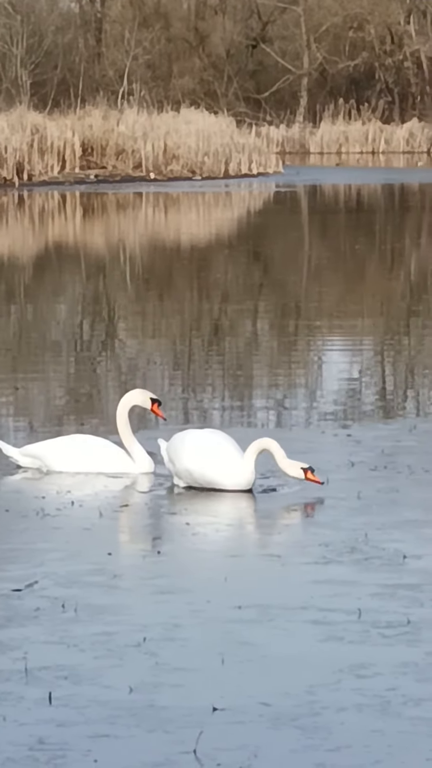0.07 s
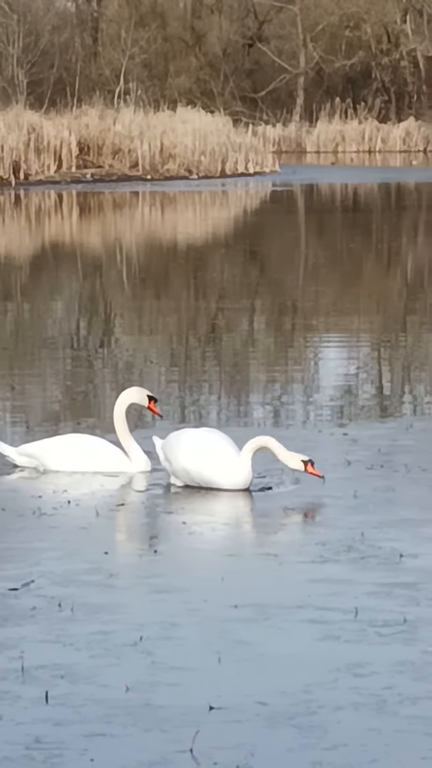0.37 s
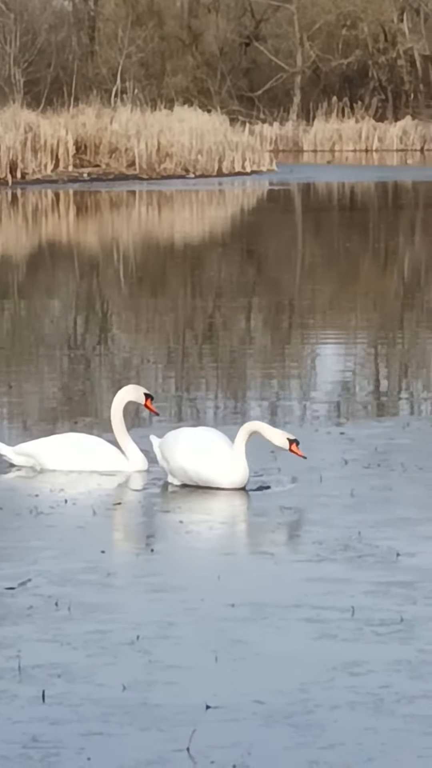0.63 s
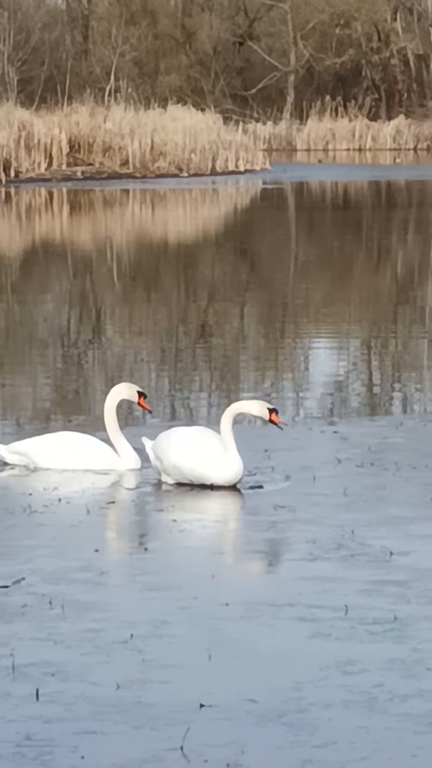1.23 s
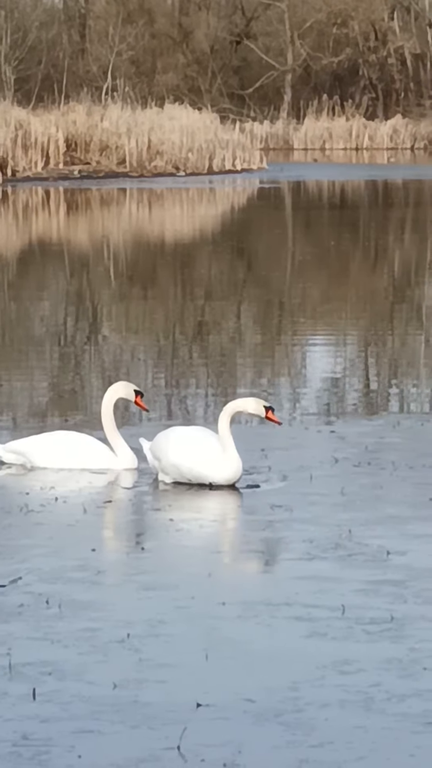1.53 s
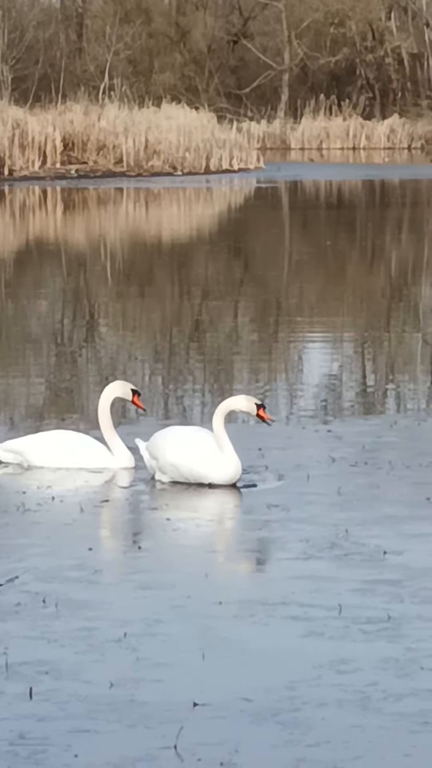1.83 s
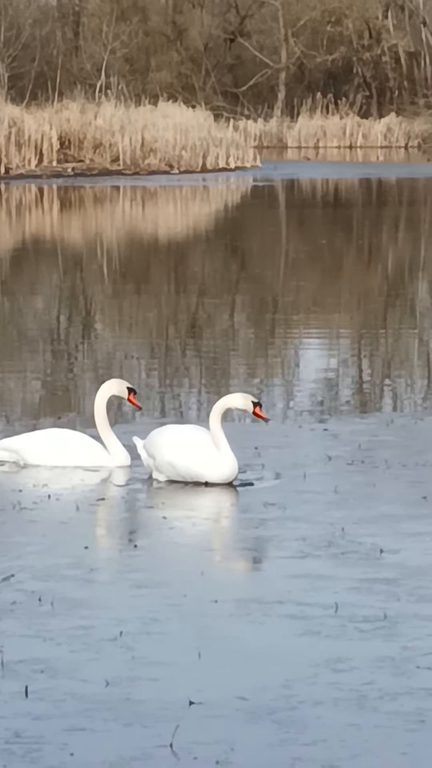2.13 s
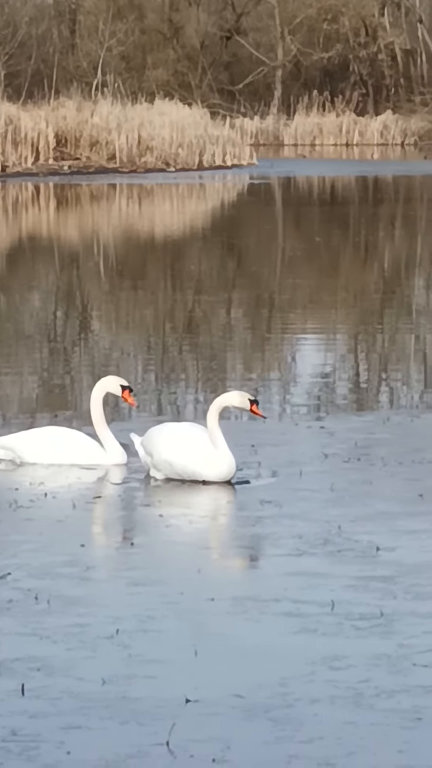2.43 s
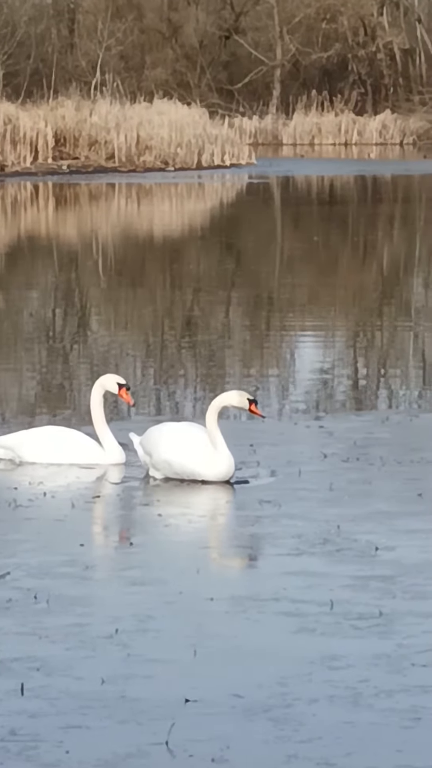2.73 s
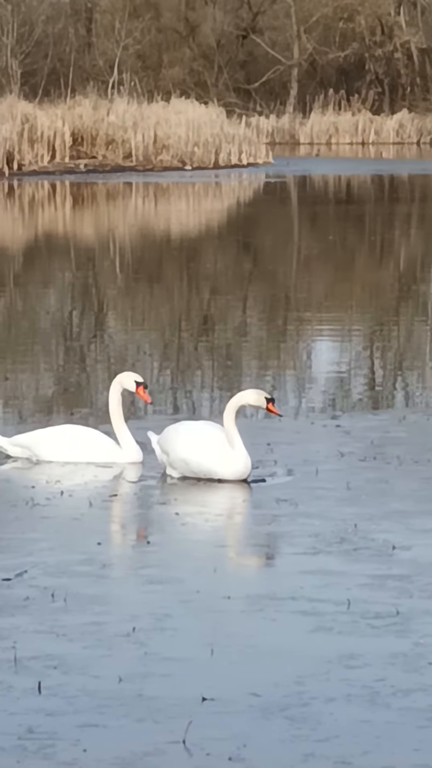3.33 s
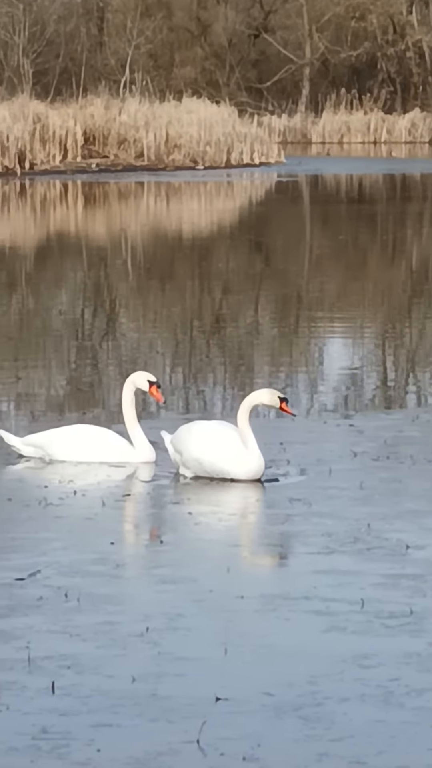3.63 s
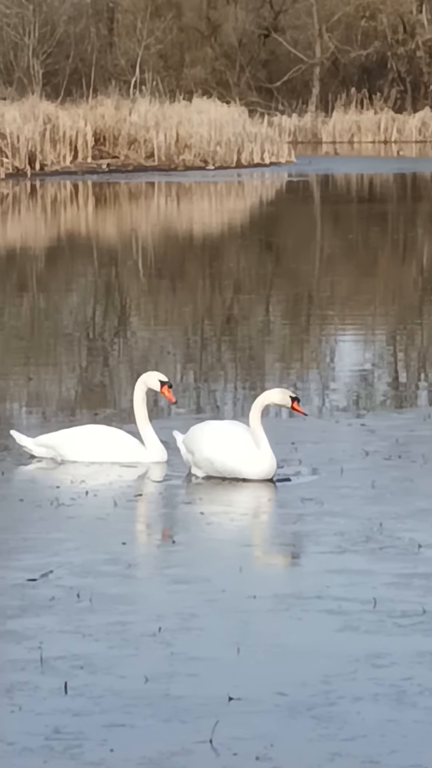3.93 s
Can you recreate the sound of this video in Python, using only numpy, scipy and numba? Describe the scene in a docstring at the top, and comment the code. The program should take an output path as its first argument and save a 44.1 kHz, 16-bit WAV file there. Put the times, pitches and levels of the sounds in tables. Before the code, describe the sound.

Hoarse, snorting swan grunts repeat on an open lake, most followed by a brief nasal hum. A breeze nudges the microphone at first, then faint ticks sound between the calls, over a low drone of far traffic.

```python
"""On a half-frozen lake, a mute swan gives seven hoarse, snorting grunts; most relax into a soft nasal hum.
A membrane beats in its throat, the throat and nose colour the sound, and the wooded shore answers.
Distant traffic rumbles and drones, and a breeze bumps the right microphone port.
Faint chirps of far songbirds and a few tiny ticks, perhaps of thin ice, come in between."""
import sys
import numpy as np
from scipy import signal
from scipy.fft import rfft, irfft, next_fast_len
from scipy.io import wavfile
from scipy.ndimage import map_coordinates
from numba import njit

SR = 44100
rng = np.random.default_rng(int(sys.argv[2]) if len(sys.argv) > 2 else 0)


def dump_mix(stems):
    """Bounce the given channels to the path in sys.argv[1] as a 16-bit WAV at rate SR."""
    frames = np.atleast_2d(stems).T  # one column per channel
    limited = np.clip(frames, -1, 1)  # hard clip at full scale
    pcm = np.round(limited * 32767).astype(np.int16)
    wavfile.write(sys.argv[1], SR, pcm)


N = 176400  # 4 seconds

# Tone colours, or how strong the lows and highs are: (frequency [Hz], gain [dB])
AIR_COLOUR = [(180, -10), (300, 1), (430, 2.5), (600, -1), (850, -2.5), (1150, -5), (1800, -2.5),
              (2100, -2.5), (2600, -9.5), (3400, -11.5), (4000, -17), (4700, -19.5), (5500, -25),
              (6800, -27), (7400, -26), (8800, -31.5), (11000, -33.5), (12000, -39), (15500, -48)]
RUMBLE_COLOUR = [(20, -54), (40, -11), (62, 0.5), (95, -0.5), (145, 1.5), (200, -5.5), (270, -17),
                 (450, -33), (900, -61)]
VEHICLE_COLOUR = [(90, -32), (170, 11.5), (240, 8.5), (330, -12.5), (700, -52.5)]
BREEZE_COLOUR = [(20, -46.5), (40, -22), (65, -1.5), (105, -1), (150, -7.5), (220, -16.5), (350, -34),
                 (700, -53), (2000, -97.5)]
BUMP_COLOUR = [(30, -34), (65, -4), (110, 5.5), (170, -3), (240, -14), (380, -30), (900, -62), (2500, -120)]
SNAP_COLOUR = [(3000, -21), (5500, -14), (6500, -4.5), (8300, 4), (10000, 0), (12000, -11), (15000, -20)]
HUM_COLOUR = [(170, -20.5), (350, -5.5), (530, 2), (710, -2), (885, 0.5), (1070, -5), (1420, -6),
              (1780, 0.5), (2130, 1.5), (2480, -5), (2750, -11), (3600, -47.5), (6000, -86)]
THROAT_COLOUR = [(180, -23.5), (330, -9), (420, -26), (530, -2), (680, -9.5), (780, -7.5), (1000, -11.5),
                 (1240, -6.5), (1450, -14.5), (1590, -6), (1740, -6), (1990, -0.5), (2200, -7),
                 (2550, -4.5), (3100, -14), (3550, -36), (4300, -40), (4950, -32), (5700, -37.5),
                 (6300, -49), (7000, -45.5), (9000, -57), (14000, -70.5)]
# How alike a noise is on the left and right: (frequency [Hz], likeness [-1 to 1])
AIR_ALIKE = [(300, 0.64), (2000, 0.21), (3500, -0.27), (12000, 0.082)]
RUMBLE_ALIKE, VEHICLE_ALIKE, WIND_ALIKE = [(200, 0.88)], [(200, 0.99)], [(100, 0)]
# Noises that swell and sink: (time [s], level [dB])
VEHICLE_LEVEL = [(0, -66), (2.6, -70.5), (3.1, -64.5), (3.55, -55.5), (4, -63)]
BREEZE_LEVEL = [(0, -41), (.8, -41.5), (1.3, -52.5), (1.9, -46.5), (2.4, -58.5), (2.9, -51.5), (3.4, -57.5),
                (4, -52.5)]
# Two far engines: (time [s], pitch [Hz], level [dB])
LOW_ENGINE = [(0, 149, -68.5), (.7, 148.5, -49.5), (1.35, 149.4, -51.5), (1.8, 149, -62), (2.4, 148, -55),
              (3.25, 148.8, -64.5), (3.8, 149.5, -53), (4, 154.9, -55)]
HIGH_ENGINE = [(0, 212.8, -66), (.4, 215.8, -68), (1.499, 217.5, -92), (2.302, 222, -69.5),
               (2.901, 221.5, -61), (3.15, 217, -61.5), (3.401, 211, -56), (4, 211.3, -58.5)]
# Short bumps of wind: (time [s], width [s], level [dB])
WIND_BUMPS = [(0.139, 0.022, -33), (0.314, 0.011, -28), (.42, 0.056, -35.5), (0.583, 0.0041, -32),
              (0.854, 0.019, -34.5)]
# How long the shore echoes: (frequency [Hz], time to fade by 60 dB [s])
SHORE_FADE = [(300, 0.85), (2000, 0.92), (3500, 0.11), (8000, 0.27)]
# Spells of birdsong: (start [s], end [s], pitch [Hz], level before the echo [dB])
BIRD_SONGS = [(1.17, 1.35, 9950, -83), (3.3, 3.9, 3560, -67)]
# Brittle ticks: (time [s], base level [dB], pitch [Hz], left over right [dB], brightness [dB])
TICKS = [(2.168, -63, 7600, -2, -21), (2.367, -62, 7360, -10, -21), (2.409, -54, 7750, -11.5, -1.5),
         (2.4895, -65, 7410, 0, -15), (2.7775, -62.5, 7040, -9, -12), (2.786, -67, 7750, -7, -22),
         (2.8005, -61, 7200, -13, -8), (2.8164, -68, 6900, -2, -12), (2.8448, -60.5, 7150, -11, -20),
         (3.024, -66, 9800, 12, -8), (3.0777, -54.5, 7780, -10.5, -5), (3.082, -65, 10500, 5, -2)]
# The swan's hums: (start [s], end [s], starting level [dB], top pitch [Hz])
HUMS = [(0.491, 0.583, -57, 354.6), (1.073, 1.228, -56, 357.5), (1.679, 1.877, -55.5, 358),
        (2.352, 2.496, -54.5, 355.1), (3, 3.151, -55, 355.4), (3.669, 3.804, -55, 358.2)]
# The swan's grunts: (start [s], end [s], base level [dB], pitch [Hz], weak beats per strong one [count],
# nasal ring [Hz], swell time [s], treble gain [dB], treble crest [share of grunt], extra gullet gain [dB])
GRUNTS = [(0.16, 0.323, -45, 351.4, 1, 2070, 0.17, -3.5, 0.56, -15),
          (0.338, 0.485, -44, 354.6, 2, 1860, 0.11, 2.5, 0.63, 4),
          (0.854, 1.025, -43, 349.6, 1, 1970, 0.15, 0.5, 0.6, -6),
          (1.459, 1.662, -45, 353.7, 2, 2030, 0.13, 2.5, 0.48, 0),
          (2.129, 2.333, -46.5, 351.7, 1, 1980, 0.093, -2.5, 0.39, -8),
          (2.822, 2.999, -46.5, 345.7, 2, 2025, 0.1, -3.5, 0.31, -1.5),
          (3.485, 3.664, -49, 350.2, 1, 2135, 0.13, -5.5, 0.46, -19)]
# How much louder the swan is on the left: (frequency [Hz], left over right [dB])
SWAN_PAN = [(350, 9.5), (600, 0), (1350, 6.5), (2100, 0), (3200, -10), (6000, 9.5)]
# How far its wave is ahead on the left: (frequency [Hz], lead [radians])
SWAN_LEAD = [(100, -1), (1030, 0.84), (1460, 1.0), (1900, 1), (2250, 0.24), (2850, 3), (5000, 8)]
# Splits a left-right gap evenly, left row first: (share [-1 to 1])
SIDES = np.array([[.5], [-.5]])

# Two ways the swan's membrane beats: rough and uneven, or smooth and steady.
HOARSE = dict(weak_db=-6, jitter_s=.00017, uneven_db=1.8, rasp_db=-7.5)
CLEAN = dict(weak_db=-4.5, jitter_s=.000015, uneven_db=.8, rasp_db=-15)


def amp(db):
    """Turn decibels into a number to multiply by."""
    return 10 ** (np.asarray(db) / 20)


def unit(x):
    """Scale a sound to an average strength (rms) of 1."""
    return x / np.sqrt(np.mean(x ** 2) + 1e-20)


def along(points, hz):
    """Read between the rows of a frequency table, on a log scale."""
    freqs, values = np.transpose(points)
    return np.interp(np.log(hz + 1), np.log(freqs + 1), values)


def curves(rows):
    """Turn each column after the time into one value per sample."""
    times, *columns = np.transpose(rows)
    return [np.interp(np.arange(N) / SR, times, column) for column in columns]


def wobble(rate):
    """A smooth curve through `rate` random values a second."""
    return map_coordinates(rng.standard_normal(400), [np.arange(N) * rate / SR], mode='wrap')


def add(track, start_s, x):
    """Mix a sound into the track at the given time."""
    part = track[..., round(start_s * SR):][..., :x.shape[-1]]
    part += x[..., :part.shape[-1]]


def filtered(x, response):
    """Scale and shift each frequency of a sound as `response` says."""
    n = x.shape[-1]
    size = next_fast_len(n + SR // 4)
    return irfft(rfft(x, size) * response(np.fft.rfftfreq(size, 1 / SR)), size)[..., :n]


def above(x, hz):
    """Keep the part of a sound above a frequency."""
    return filtered(x, lambda f: 1 - 1 / (1 + (f / hz) ** 20))


def resonance(x, hz, width_hz):
    """Let a sound ring in one band of frequencies."""
    return filtered(x, lambda f: 1j * f * width_hz / (hz ** 2 - f * f + 1j * f * width_hz))


@njit
def moving_resonance(x, hz, width_hz):
    """Let a sound ring in a band whose centre moves."""
    turn, damping = 2 * np.pi * hz / SR, 2 * np.pi * width_hz / SR
    out, low, band = np.zeros(len(x)), 0., 0.
    for i in range(len(x)):
        low += turn[i] * band
        band += turn[i] * (x[i] - low) - damping * band
        out[i] = band * damping / turn[i]
    return out


def ring(x, colour):
    """Pass a sound through a body that rings with the given tone colour."""
    size = 4096
    gain_db = np.maximum(along(colour, np.fft.rfftfreq(size, 1 / SR)), -100)
    cepstrum = irfft(np.log(amp(gain_db)))
    # Fold it so that the body rings only after it is struck.
    cepstrum[1:size // 2] *= 2
    cepstrum[size // 2 + 1:] = 0
    return signal.fftconvolve(x, irfft(np.exp(rfft(cepstrum))))[:len(x)]


def rush(colour, alike):
    """Rushing stereo noise with a given tone colour and left-right likeness."""
    def response(hz):
        spread = np.arccos(np.clip(along(alike, hz), -1, 1)) / 2
        return amp(along(colour, hz)) * [np.cos(spread), np.sin(spread)]
    mid, side = filtered(rng.standard_normal((2, N)), response)
    return unit(np.array([mid + side, mid - side]))


def open_air():
    """A soft hush whose level flickers slightly."""
    return amp(-62 + 0.2 * wobble(rate=16)) * rush(AIR_COLOUR, AIR_ALIKE)


def traffic():
    """A far rumble with two wavering engine drones; one vehicle draws nearer at the end."""
    rumble = amp(-54.5) * rush(RUMBLE_COLOUR, RUMBLE_ALIKE)
    vehicle = amp(curves(VEHICLE_LEVEL)[0]) * rush(VEHICLE_COLOUR, VEHICLE_ALIKE)
    out = rumble + vehicle
    for engine in LOW_ENGINE, HIGH_ENGINE:
        hz, db = curves(engine)
        gain = amp(db + 0.44 * wobble(rate=5)) * np.sqrt(2)
        pitch = hz + .6 * wobble(rate=10)
        out += gain * np.sin(2 * np.pi * np.cumsum(pitch) / SR)
    return out


def wind():
    """A breeze with short, brighter bumps buffets the right microphone port."""
    t = np.arange(N) / SR
    breeze = amp(curves(BREEZE_LEVEL)[0]) * rush(BREEZE_COLOUR, WIND_ALIKE)
    bump_gain = sum(amp(db) * np.exp(-.5 * ((t - time) / width) ** 2) for time, width, db in WIND_BUMPS)
    bumps = bump_gain * rush(BUMP_COLOUR, WIND_ALIKE)
    return (breeze + bumps) * amp([[-33], [0]])  # the left port is sheltered


def shore_echo(x, delay_s=0.018):
    """Reeds and trees send back a blurred echo whose highs die first."""
    hz, t, noise = signal.stft(rng.standard_normal((2, SR)), SR, nperseg=256)
    fade = amp(-60 * t / along(SHORE_FADE, hz)[:, None])
    tail = signal.istft(noise * fade, SR, nperseg=256)[1]
    tail = tail + 0.098 * tail[::-1]  # left and right mix a little
    tail /= np.sqrt(np.mean(abs(rfft(tail, SR)[:, 1500:2500]) ** 2))  # gain of 1 around 2000 Hz
    delayed = np.pad(x, (int(delay_s * SR), 0))
    return signal.fftconvolve(delayed[None], tail, axes=1)[:, :N]


def songbirds():
    """Very faint, warbling chirps, heard only through the trees of the far shore."""
    out, t = np.zeros(N), np.arange(N) / SR
    for start, end, hz, db in BIRD_SONGS:
        progress = np.clip((t - start) / (end - start), 0, 1)
        arch = np.sqrt(np.abs(np.sin(np.pi * progress)))
        flutter = unit(amp(5 * np.tanh(wobble(rate=26))))
        pitch = hz * (1 + .055 * wobble(rate=190))
        out += arch * amp(db) * flutter * np.sin(2 * np.pi * np.cumsum(pitch) / SR)
    return shore_echo(out)


def ticks(fade_s=0.007, rise_s=0.00014, left_lag_s=.00005):
    """Tiny brittle ticks, perhaps of thin ice: each is a sharp snap and two briefly ringing tones."""
    out, t = np.zeros((2, N)), np.arange(SR // 20) / SR
    for start, db, hz, pan_db, bright_db in TICKS:
        # The snap's colour shifts with the pitch; brightness sets its top end.
        colour = [(f * hz / 7560, level + bright_db * (f > 9000)) for f, level in SNAP_COLOUR]
        snap = ring(signal.unit_impulse(len(t)), colour)
        phase = 2 * np.pi * hz * t
        tones = np.sin(phase) + amp(bright_db) * np.sin(1.4 * phase)
        tones *= amp(-60 * t / fade_s) * (1 - np.exp(-t / rise_s))
        tick = tones + amp(4.5) * snap / abs(snap).max()
        add(out, start, amp(db - 2 + SIDES * pan_db) * tick)
    return filtered(out, lambda f: np.exp(-2j * np.pi * f * SIDES * left_lag_s))


def near_echoes(x, fade_s=0.0033):
    """Add a quick spray of echoes off the nearby ice and bank."""
    t = np.arange(SR // 40) / SR
    spray = rng.standard_normal(len(t)) * t * np.exp(-t / fade_s)
    return x + amp(-9) * signal.fftconvolve(x, spray / np.linalg.norm(spray))[:len(x)]


def membrane(pitch, weak_count, weak_db, jitter_s, uneven_db, rasp_db, puff_s=0.0062):
    """The voice's membrane beats: weak, slack beats follow each strong one, all with a puff of air."""
    n = len(pitch)
    cycles = np.cumsum(pitch) / SR
    beat = np.arange(1, int(cycles[-1]))
    late, size = rng.standard_normal((256, 2))[beat].T
    position = np.interp(beat, cycles, np.arange(n)) + jitter_s * SR * late
    is_weak = beat % (weak_count + 1) > 0
    gain = amp(uneven_db * size + weak_db * is_weak)
    # Beats fall between samples, so each is spread over its neighbours.
    nearby = position.astype(int)[:, None] + np.arange(-7, 9)
    offset = nearby - position[:, None]
    shapes = gain[:, None] * np.sinc(offset) * np.sinc(offset / 8)
    pulses = np.bincount(np.clip(nearby, 0, n - 1).ravel(), shapes.ravel(), n)
    puff_gain = signal.lfilter([1], [1, -np.exp(-1 / (puff_s * SR))], pulses)
    puffs = puff_gain * rng.standard_normal(SR)[:n]
    return unit(pulses) + amp(rasp_db) * unit(puffs)


def hums(edge_s=0.024):
    """The relaxed voice sounds on, hoarse at first and then clean, in a shallow arch of pitch."""
    out = np.zeros(N)
    for start, end, db, hz in HUMS:
        t = np.arange(int((end - start + edge_s) * SR)) / SR
        progress = t / (end - start)
        pitch = hz * (1 - 0.106 * (progress - 0.423) ** 2)
        hoarseness = np.clip(1 - (progress / 0.36) ** 2, 0, 1)
        rough = hoarseness * membrane(pitch, weak_count=1, **HOARSE)
        smooth = (1 - hoarseness) * membrane(pitch, weak_count=1, **CLEAN)
        voice = unit(ring(rough + smooth, HUM_COLOUR))
        edges = np.clip(np.minimum(t, t[-1] - t) / edge_s, 0, 1)
        add(out, start, voice * amp(db - 4 * progress) * edges)
    return out


def nasal_ring(voice, progress, hz):
    """A nasal ring gathers through the grunt; it rises, sinks and wanders on the way."""
    arch = 0.028 * np.sin(np.pi * progress)
    wander = 0.025 * (1 - progress / 2) * wobble(rate=45)[:len(voice)]
    return amp(3) * progress ** 0.62 * moving_resonance(voice, hz * (1 + arch + wander), width_hz=300)


def throat_click():
    """One click rings in the throat as the fifth grunt begins."""
    out = np.zeros(N)
    throat = ring(signal.unit_impulse(SR // 20), THROAT_COLOUR)
    click = resonance(throat, hz=2260, width_hz=200)
    add(out, 2.1672, amp(-32.5) * click / abs(click).max())
    return out


def grunts(climb_s=.065, open_s=0.051, onset_s=.015, release_s=0.0085):
    """Rough beats swell and climb in pitch; the gullet rings first, then the nose takes over."""
    out = np.zeros(N)
    for start, end, db, hz, weak_count, nasal_hz, swell_s, treble_db, crest, gullet_db in GRUNTS:
        t = np.arange(int((end - start + .06) * SR)) / SR
        progress = np.minimum(t / (end - start), 1)
        pitch = hz * (1 - .16 * np.exp(-t / climb_s) + 0.0197 * wobble(rate=45)[:len(t)])
        beats = membrane(pitch, weak_count, **HOARSE)
        voice = near_echoes(ring(beats, THROAT_COLOUR))
        nasal = nasal_ring(voice, progress, nasal_hz)
        gullet = amp(7 + gullet_db) * (1 - progress) * resonance(voice, hz=1570, width_hz=170)
        # The treble rises and falls with the effort, while the low chest tones give way.
        effort_db = treble_db - 24.5 * (progress - crest) ** 2
        treble_change = above(voice, hz=2350) * (amp(effort_db) - 1)
        chest = filtered(voice, lambda f: 1 / (1 + (f / 1410) ** 10))
        chest_change = chest * (amp(-4.5 * progress ** 2) - 1)
        voice = unit(voice + nasal + gullet + treble_change + chest_change)
        # The start is throaty: the highs open up a moment later.
        muffle_db = -12.5 * np.clip(1 - t / open_s, 0, 1)
        voice += (amp(muffle_db) - 1) * above(voice, hz=1800)
        # The grunt swells, sags a little, then stops short.
        swell_db = -11 * np.clip(1 - t / swell_s, 0, 1) ** 1.5
        sag_db = -progress ** 4
        edges = np.minimum(t / onset_s, 1) * np.exp(-np.maximum(t - end + start, 0) / release_s)
        add(out, start, amp(db + swell_db + sag_db) * voice * edges)
    return out


def swan(bank_delay_s=.068):
    """The swan calls from a little to the left; the reed bank gives one clear echo, the shore a blur."""
    voice = grunts() + throat_click() + hums()
    direct = filtered(
        voice, lambda hz: amp(SIDES * along(SWAN_PAN, hz)) * np.exp(1j * SIDES * along(SWAN_LEAD, hz)))
    bounce = resonance(voice, hz=2100, width_hz=400)
    bank_echo = np.pad(bounce, (round(bank_delay_s * SR), 0))[:N]
    return direct + amp(-15) * bank_echo + amp(-9.5) * shore_echo(voice)


def scene():
    """Swan, ticks, wind, traffic and far birds over the hush of open air."""
    return swan() + ticks() + wind() + traffic() + songbirds() + open_air()


def record(dry):
    """Cut away the very highest treble."""
    return filtered(dry, lambda hz: hz < 15700)


dry = scene()
out = record(dry)
dump_mix(out)
```